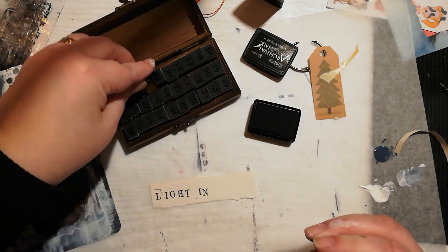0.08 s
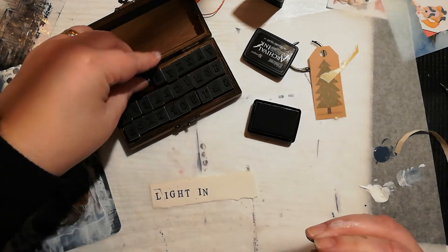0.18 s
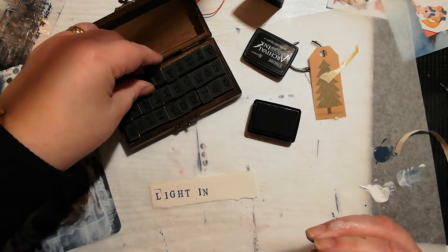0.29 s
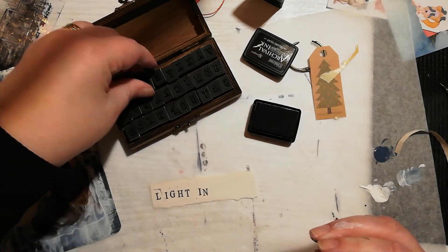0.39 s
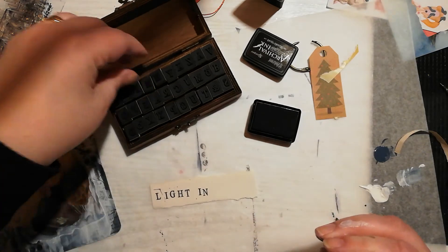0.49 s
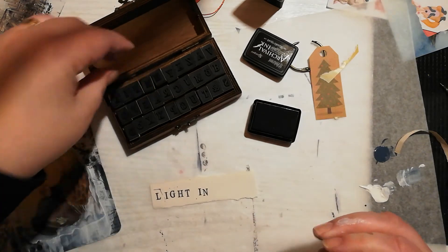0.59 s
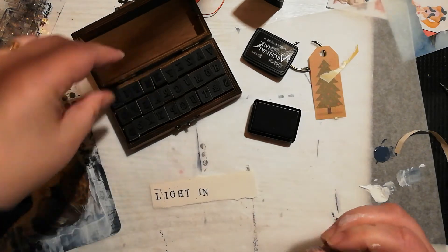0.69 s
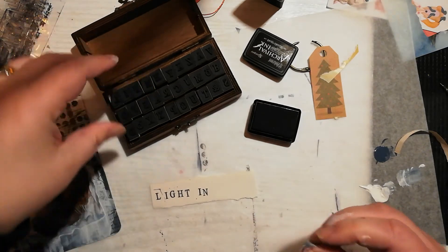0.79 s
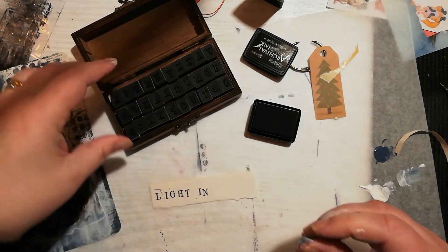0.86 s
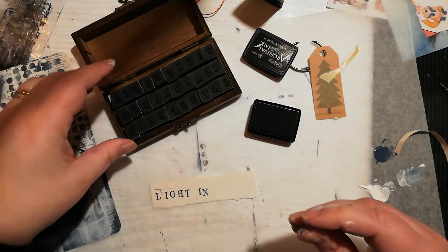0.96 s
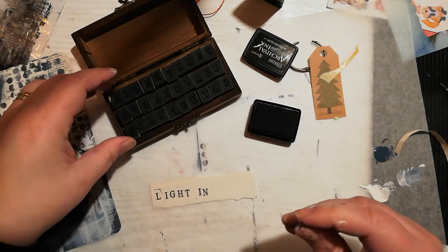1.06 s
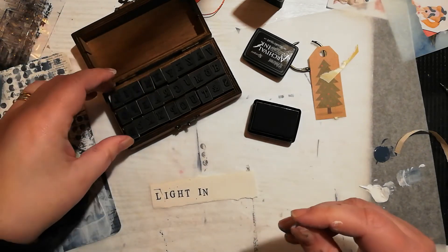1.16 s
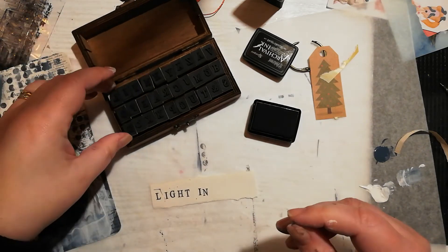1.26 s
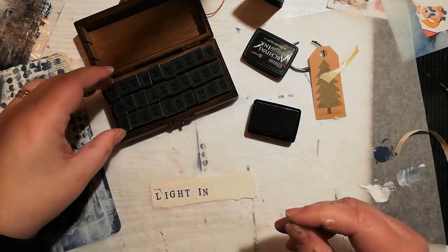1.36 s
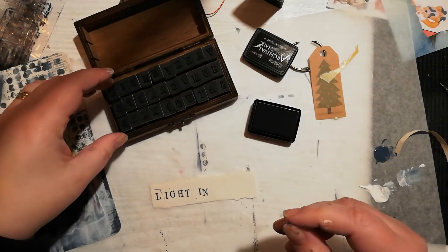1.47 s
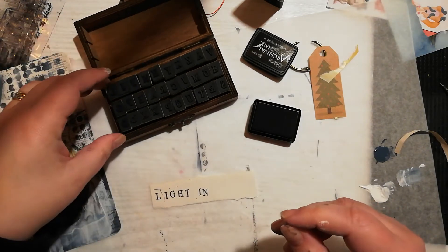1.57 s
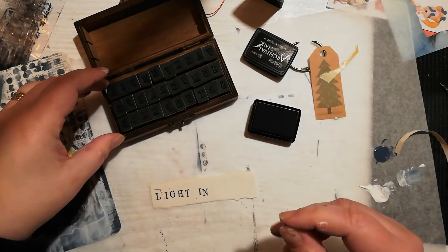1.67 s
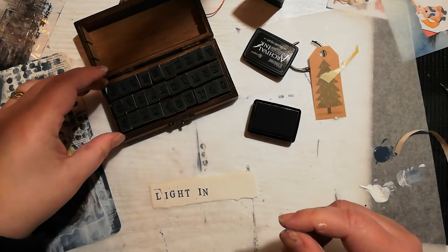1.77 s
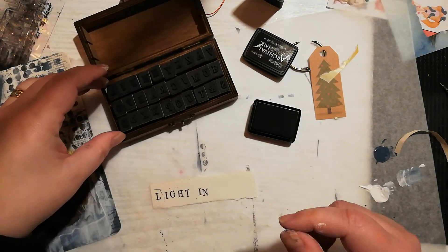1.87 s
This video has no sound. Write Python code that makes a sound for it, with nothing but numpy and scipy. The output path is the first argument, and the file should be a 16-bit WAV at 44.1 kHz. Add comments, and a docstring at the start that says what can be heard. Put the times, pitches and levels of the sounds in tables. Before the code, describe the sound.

Close up in a quiet, hissy room, fingers put a little wooden block back in its box: a sharp knock, tiny clicks and a faint squeak, a louder knock settling quickly, later a gritty paper brush with a snap.

```python
"""A quiet room, heard by a close stereo microphone: wavering low hum (narrow noise bands) and steady hiss.
Fingers drop a small wooden stamp back among its neighbours in a wooden box: blows excite decaying wood modes
with a contact tick and a noise crack, many tiny blows rattle, and a narrow noise band squeaks.
A hand brushes, briefly at first and longer later, over the paper on the table: gritty coloured noise and
a few snaps. Narrow noise bands make low thrums and thumps, some only chance swells of the room noise."""
import sys
import numpy as np
from scipy import signal
from scipy.fft import rfft, irfft
from scipy.io import wavfile
from scipy.ndimage import uniform_filter1d

SR = 44100
rng = np.random.default_rng(int(sys.argv[2]) if len(sys.argv) > 2 else 0)


def undo_db(level):
    """Turn decibels back into plain size, where 20 dB means ten times bigger."""
    steps = np.asarray(level, float) / 20
    return 10 ** steps


def wrap_up_sound(samples):
    """Save the sound to the file named by the first command line argument, as 16-bit audio."""
    columns = np.atleast_2d(samples).T
    # keep every value between -1 and 1, then stretch to whole-number steps
    tamed = np.clip(columns, -1, 1)
    steps = np.round(tamed * 32767).astype(np.int16)
    wavfile.write(sys.argv[1], SR, steps)


N = 83790

# modes of blocks and box: f/Hz, relative level/dB, undamped t60/s
WOOD_MODES = [(1200, -33, .015), (1520, -25, .02), (1821, -1, 0.021), (2200, -18.5, .024),
              (2622, -5.5, 0.02), (3070, -9, .018), (3666, -6.5, .02), (4147, -10, .02), (4690, 6, .016),
              (5160, 12.5, .014), (5700, -2, 0.023), (7000, 0, 0.015), (8276, -2.5, .009), (9600, -2, .012),
              (10884, -13.5, .012)]


def evened(x):
    """Scales to rms 1."""
    return x / np.sqrt(np.mean(x ** 2) + 1e-20)


def read(points, hz):
    """Reads a table on a log-frequency axis."""
    f, value = np.transpose(points)
    return np.interp(np.log(hz + 1), np.log(f + 1), value)


def level(tables, index=1):
    """Gain over time from several short dB curves, silent between them."""
    t = np.arange(N) / SR
    gain = 0
    for rows in tables:
        columns = np.transpose(rows)
        gain = gain + undo_db(np.interp(t, columns[0], columns[index], -200, -200))
    return gain


def add(mix, s, sound):
    """Mixes a sound in place at s seconds, cut at the end of the mix."""
    part = mix[..., round(s * SR):][..., :sound.shape[-1]]
    part += sound[..., :part.shape[-1]]


def panned(db):
    """Left and right gains, db apart."""
    return undo_db(np.array([[.5], [-.5]]) * db)


def high_pass(x, hz, order):
    """Removes what lies under hz."""
    return signal.sosfilt(signal.butter(order, hz, "high", fs=SR, output="sos"), x)


def noise(spectrum, alike, patch_db, size):
    """Two channels of coloured noise, rms 1, whose spectrum drifts in patches of time and frequency."""
    hz = np.fft.rfftfreq(size, 1 / SR)
    frames = N * 4 // size + 5
    a, b, c, d, patches = rng.standard_normal((frames, len(hz), 5)).T
    patches = uniform_filter1d(patches, size=10, axis=0)
    patches = evened(uniform_filter1d(patches, size=6, axis=1))
    same = np.clip(alike(hz), -1, 1)[:, None]
    left, other = a + 1j * b, c + 1j * d
    z = np.array([left, same * left + np.sqrt(1 - same ** 2) * other])
    z = z * undo_db(read(spectrum, hz)[:, None] + patch_db * patches)
    return evened(signal.istft(z, nperseg=size, noverlap=size * 3 // 4)[1][:, :N])


def whistle(hz, width_hz, count):
    """Narrow-band noise, rms 1: a carrier at hz under slow complex noise."""
    slow = rng.standard_normal((count, 2)) @ [1, 1j]
    r = np.exp(-np.pi * width_hz / SR)
    slow = signal.lfilter([1], [1, -r], np.tile(slow, 2))[count:]  # second pass: settled
    carrier = np.exp(2j * np.pi * np.cumsum(hz * np.ones(count)) / SR)
    return evened((slow * carrier).real)


def swell(t, peak_s):
    """Soft rise to 1 at peak_s, then a quick fall."""
    return (t / peak_s * np.exp(1 - t / peak_s)) ** 2


def ring(hz, chance_db=0, tune=1, damp=1):
    """Decaying wood modes; a soft contact, of low hz, leaves the high ones weak."""
    rise_s = 0.00032
    corner, reach_oct, far_db = 1.2, .1, -24  # fade above corner x hz, down to far_db
    f, db, t60 = np.transpose(WOOD_MODES)[:, :, None]
    t = np.arange(3000) / SR
    above_oct = np.maximum(np.log2(f / (corner * hz)), 0)
    near = undo_db(far_db) + np.exp(-.5 * (above_oct / reach_oct) ** 2)
    decay = undo_db(db + chance_db - 60 * t / (t60 * damp))
    modes = near * decay * np.sin(2 * np.pi * f * tune * t)
    return modes.sum(0) * (1 - np.exp(-t / rise_s))


def floor():
    """Room tone and microphone hiss as coloured noise, plus a hum of narrow wavering bands."""
    # room tone and hiss spectrum: f/Hz, relative density/dB per Hz
    floor_colour = [(12, -36.5), (20, -1.5), (70, -12), (104, -2.5), (126, -21), (283, -11), (384, -18),
                    (494, -17.5), (537, -16.5), (635, -15.5), (1310, -19), (1470, -18.5), (4000, -22),
                    (9230, -22.5), (15700, -36)]
    # left-right likeness: f/Hz, correlation
    floor_alike = [(60, 1), (130, 0.67), (290, 0.0053), (640, -0.86), (1410, 0.39), (3100, -0.038),
                   (6820, -0.24), (15000, 0.2)]
    # hum bands: f/Hz, width/Hz, level/dB
    hum_bands = [(27.8, 5, -73), (100.3, 10.4, -71.5), (198.3, 14, -77.5)]
    floor_db, patch_db = -63.5, 2.5
    hum = sum(undo_db(db) * whistle(hz, width_hz, count=N) for hz, width_hz, db in hum_bands)
    hiss = noise(floor_colour, lambda hz: read(floor_alike, hz), patch_db, size=2048)
    return undo_db(floor_db) * hiss + hum


def thrums():
    """Low thrums and thumps: narrow noise bands, each fading in and out over half a sine."""
    # under hand and blow, some only chance swells of the low room noise:
    # start t/s, length/s, f/Hz, width/Hz, level before fade/dB
    thrum_rows = [(.09, 0.079, 480, 71, -63.5), (0.12, 0.14, 334, 100, -67.5), (.185, 0.016, 296, 92, -62),
                  (1.246, 0.081, 530, 125, -73), (1.33, 0.059, 468, 31, -56.5),
                  (1.385, 0.046, 190, 53.7, -56.5), (1.41, 0.054, 116, 31.86, -62),
                  (0.0043, 0.04, 101.9, 47, -56.5), (0.255, 0.076, 112, 40, -62.5),
                  (0.14, 0.041, 142, 84, -62.5), (0.19, 0.066, 350, 210, -67.5),
                  (.398, 0.013, 480, 450, -60), (1.30, 0.11, 150, 119.3, -63.5)]
    out = np.zeros((2, N))
    for s, length_s, hz, width_hz, db in thrum_rows:
        count = int(length_s * SR)
        fade = np.sin(np.pi * np.arange(count) / count)
        thrum = undo_db(db) * fade * whistle(hz, width_hz, count=count)
        add(out, s, thrum * np.ones((2, 1)))
    return out


def brush():
    """Skin slides over paper and skin: gritty noise bands and a thin rubbing hiss."""
    # strokes of skin on paper: t/s, treble level/dB, low-middle level/dB, high-middle level/dB
    strokes = [
        [(0.07, -70.5, -80, -73), (0.084, -83, -72, -71), (0.092, -71, -69.5, -70),
         (0.146, -58.5, -59.5, -65.5), (0.174, -69, -66, -63.5), (0.194, -58, -69, -50), (0.204, -59, -49, -58)],
        [(1.131, -77, -88, -85), (1.165, -74, -84, -80), (1.19, -71, -81, -65), (1.206, -67, -78, -63.5),
         (1.224, -77, -75, -71), (1.252, -75, -64, -72), (1.286, -76, -69, -77)],
        [(1.288, -68.5, -67, -75), (1.347, -65, -63.5, -72), (1.395, -49.5, -54.5, -58),
         (1.403, -50.5, -55, -60), (1.417, -57.5, -60, -64), (1.441, -74, -69, -83), (1.46, -92.5, -72, -87)],
    ]
    # treble, low-middle and high-middle spectra: f/Hz, relative density/dB per Hz
    treble_colour = [(3410, -41), (5800, -5), (6750, -2), (9160, 2), (10900, -3), (11600, -21),
                     (15500, -14)]
    low_mid_colour = [(440, -23), (750, -24), (972, -3.5), (1950, -10.5), (2360, -3), (3400, -5.5),
                      (4420, -21), (7480, -120)]
    high_mid_colour = [(2000, -33), (3400, -11.5), (4370, -7), (5800, -14.5), (7540, -17.5), (12800, -120)]
    # fingertips rubbing: t/s, level/dB
    rub_curve = [(0.86, -70.5), (0.904, -70), (0.97, -60), (1.046, -73), (1.056, -64.5), (1.078, -79),
                 (1.084, -72.5), (1.13, -70.5)]
    # rubbing spectrum: f/Hz, relative density/dB per Hz
    rub_colour = [(4120, -39), (7000, -10), (7650, -4), (9690, -0.5), (10500, -5), (11700, -7),
                  (15000, -13.5)]
    alike, grit_db, patch_db = 0.56, 1.5, 2.0
    grit = undo_db(grit_db * evened(uniform_filter1d(rng.standard_normal(N), size=90)))
    colours = (rub_colour, treble_colour, low_mid_colour, high_mid_colour)
    hiss = [noise(colour, lambda hz: alike + 0 * hz, patch_db, size=256) for colour in colours]
    sliding = sum(level(strokes, index=k) * hiss[k] for k in range(1, 4))
    return level([rub_curve]) * hiss[0] + grit * sliding


def snaps():
    """The paper snaps: short bright noise bursts, partly alike on both sides."""
    # snaps: t/s, level/dB
    snap_rows = [(1.4019, -37), (1.4096, -49.5), (1.2, -53), (.999, -65), (1.1, -63)]
    peak_s, low_hz, top_hz = .0008, 5500, 11500
    out, t = np.zeros((2, N)), np.arange(1000) / SR
    hiss = rng.standard_normal((len(snap_rows), 3, 1000))
    hiss = hiss[:, :1] + 0.62 * hiss[:, 1:]  # shared + own
    band = signal.butter(N=2, Wn=[low_hz, top_hz], btype="band", fs=SR, output="sos")
    bursts = evened(signal.sosfilt(band, hiss)) * swell(t, peak_s)
    for (s, db), burst in zip(snap_rows, bursts):
        add(out, s, undo_db(db) * burst)
    return out


def squeak():
    """A block squeaks on its neighbour: a gliding thin stick-slip tone with its octave, as narrow noise."""
    # glide: t/s, f/Hz, level of the fundamental/dB
    glide = [(0.184, 4630, -67.5), (0.196, 4662, -46), (0.206, 4703, -46), (0.213, 4812, -55.5)]
    width_hz, octave_db = 150, -10.5
    s, hz, _ = np.transpose(glide)
    hz = np.interp(np.arange(N) / SR, s, hz)
    tone = whistle(hz, width_hz, count=N)
    octave = whistle(2 * hz, 2 * width_hz, count=N)
    return level([glide], index=2) * (tone + undo_db(octave_db) * octave)


def rattle():
    """Many tiny blows at random while the blocks settle; each block is tuned a little apart."""
    # blocks jostling, several curves: t/s, level/dB
    jostle = [
        [(0.023, -55), (0.034, -66), (0.056, -93.5), (0.07, -79.5)],
        [(0.17, -59.5), (0.204, -53)],
        [(0.227, -46.5), (0.236, -49.5), (0.276, -49.5), (0.3, -62.5), (0.325, -61)],
        [(0.334, -55.5), (0.346, -50.5)],
        [(0.358, -45), (0.362, -54.5), (0.374, -66), (0.379, -57.5)],
        [(0.415, -39.5), (0.433, -42), (0.56, -86.5)],
    ]
    rate_per_s, spread_db, kinds = 900, 3, 12
    contact_hz, detune, damp = 3300, .06, .35
    size = undo_db(spread_db * np.minimum(rng.exponential(1, N), 3))
    size = size * (rng.random(N) < rate_per_s / SR)
    kind = rng.integers(0, kinds, N)
    colour, tune = rng.standard_normal((2, kinds, len(WOOD_MODES), 1))
    blows = size * level(jostle)
    out = 0
    for k in range(kinds):
        block = evened(ring(contact_hz, 4 * colour[k], 1 + detune * tune[k], damp))
        out = out + signal.oaconvolve(blows * (kind == k), block)[:N]
    return out / np.sqrt(3000 * np.mean(size ** 2))  # rms follows the curves


def knocks():
    """Blocks strike: each blow is a short contact tick, the ring of the wood and a bright noise crack."""
    # blows: t/s, peak of tick and ring/dB, contact f/Hz, tick over ring/dB, tick peak time/ms,
    # crack re blow peak/dB, left minus right/dB
    blows = [(.0163, -33, 3100, 3, 0.57, -23, -0.5), (.0955, -52, 3550, 15.5, 0.36, -4, 3.5),
             (.142, -45.5, 2410, 8.5, 0.45, 2, 0), (.188, -42, 2730, 14, 1.35, -25, 8),
             (.1925, -43, 1600, 6, 0.89, -18.5, 4), (0.2062, -36.5, 3060, 13.5, 1, -9.5, 3.5),
             (0.215, -8.5, 2320, 5, 0.59, -15.5, 1), (.2232, -24, 2300, 3.5, .55, -18.5, -3.5),
             (.2395, -42, 2400, 3.5, .6, -21, -0.5), (.2465, -40, 2000, 5.5, 0.55, -24, 0),
             (.2585, -40.5, 2100, 4.5, 0.54, -23, -3.5), (.2725, -38, 2300, 3.5, 0.69, -27, 5),
             (.3298, -38.5, 3970, 10.5, 0.38, -14, -3.5), (.338, -46, 3300, 1.5, 0.59, -22, 1),
             (.3523, -27, 2800, 8.5, 0.55, -30.5, 2), (.384, -34.5, 1900, 1, .6, -27, -6),
             (.3888, -23.5, 2200, 9, 0.31, -34.5, 2.5), (.4, -5, 3320, 10.5, 0.49, -24, -4.5),
             (.407, -20, 2200, 6.5, .4, -35.5, -4), (.4085, -25, 3200, 14.5, 0.93, -38.5, 6),
             (.4125, -32, 2900, 6, 0.9, -30.5, -1), (.4218, -24, 2500, 4.5, 0.57, -35.5, 4),
             (.434, -27.5, 2400, 4.5, 0.53, -33, 6), (.442, -33, 3100, 6, 0.37, -31, 2.5),
             (.4562, -35.5, 2800, 10, .55, -25, -1.5), (1.254, -51.5, 1350, 17.5, 0.83, -32.5, 0),
             (1.2692, -44, 2220, 4.5, 1.1, -40, -2)]
    crack_t60_s, crack_rise_s = 0.0041, 0.00025
    crack_hz, crack_top_hz, alike = 4000, 10500, 0.46
    out, t = np.zeros((2, N)), np.arange(3000) / SR
    hiss = rng.standard_normal((len(blows), 3, 3000))
    hiss = alike * hiss[:, :1] + (1 - alike) * hiss[:, 1:]  # shared + own
    band = signal.butter(N=3, Wn=[crack_hz, crack_top_hz], btype="band", fs=SR, output="sos")
    cracks = evened(signal.sosfilt(band, hiss)) * undo_db(-60 * t / crack_t60_s)
    cracks = cracks * (1 - np.exp(-t / crack_rise_s))
    for (s, db, hz, tick_db, tick_ms, crack_db, pan_db), crack in zip(blows, cracks):
        body = ring(hz)
        tick = undo_db(tick_db) * swell(t, tick_ms / 1000) * np.sin(2 * np.pi * hz * t)
        blow = body / abs(body).max() + tick
        blow = blow / abs(blow).max()
        add(out, s, undo_db(db) * panned(pan_db) * (blow + undo_db(crack_db) * crack))
    return out


def echoes(x):
    """Sparse random reflections: quick scatter between the box walls, then the room dying band by band."""
    # room decay: f/Hz, t60/s
    room_t60 = [(700, 0.21), (1500, .15), (3000, 0.27), (6000, 0.082), (12000, 0.031)]
    room_db, box_db, box_t60_s = -23, -18.5, 0.0091
    taps = np.zeros((2, 16000))
    at = np.arange(40, 15960, 20) + rng.integers(0, 20, (2, 796))
    np.put_along_axis(taps, at, rng.choice([-1., 1.], at.shape), 1)
    hz, t, z = signal.stft(taps, SR, nperseg=128)
    z = z * undo_db(-60 * t / read(room_t60, hz)[:, None])
    room = signal.istft(z, SR, nperseg=128)[1][:, :16000]
    box = taps * undo_db(-60 * np.arange(16000) / SR / box_t60_s)
    tail = undo_db(room_db) * room / np.linalg.norm(room[0]) + undo_db(box_db) * box / np.linalg.norm(box[0])
    return signal.fftconvolve(x[None], tail, axes=1)[:, :N]


def scene():
    """The box reaches the right microphone port first; the ports colour it differently."""
    # port colour: f/Hz, left minus right/dB
    port_colour = [(1000, -3), (2400, 3), (4400, 2), (8000, -21.5), (15000, -2.5)]
    left_lag_s = .00006
    # the small blocks carry no bass
    box = high_pass(knocks() + rattle() + squeak(), hz=1150, order=5)
    hz = np.fft.rfftfreq(N, 1 / SR)
    lag = np.exp(-2j * np.pi * hz * np.array([[left_lag_s], [0]]))
    ports = panned(read(port_colour, hz)) * lag
    heard_box = irfft(rfft(box + echoes(box.mean(0))) * ports, N)
    return heard_box + brush() + thrums() + snaps() + floor()


def band_limit(x):
    """A steep low-pass at the top of the band."""
    return signal.sosfilt(signal.butter(12, 15830, fs=SR, output="sos"), x)


def record(dry):
    """Linear-phase low-pass limits the band of the mix."""
    edge = signal.firwin(numtaps=255, cutoff=15700, window=("kaiser", 9), fs=SR)
    mix = signal.oaconvolve(dry, edge[None], "same", axes=1)
    return band_limit(mix)


dry = scene()
out = record(dry)
wrap_up_sound(out)
```